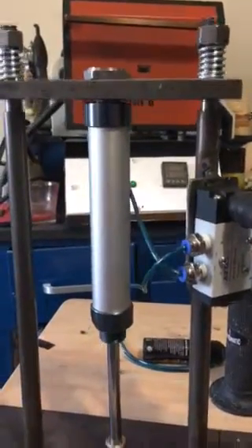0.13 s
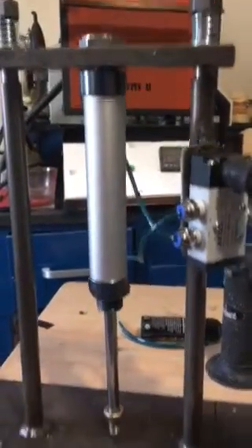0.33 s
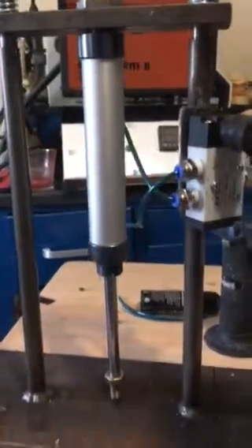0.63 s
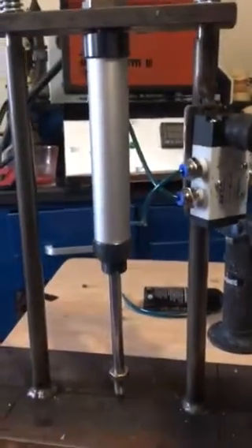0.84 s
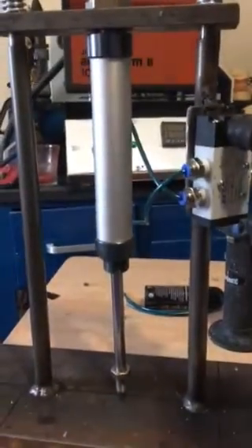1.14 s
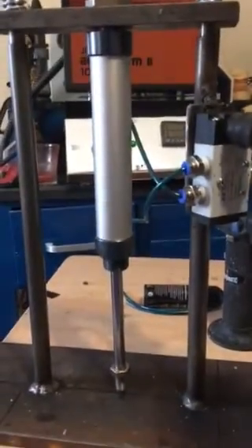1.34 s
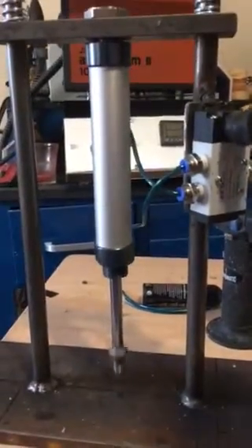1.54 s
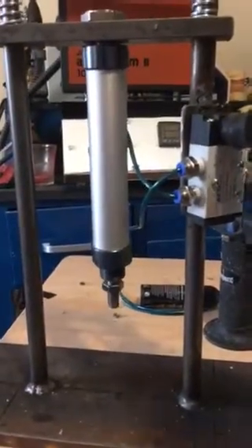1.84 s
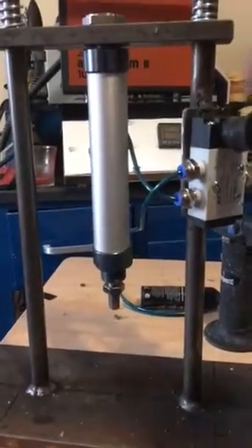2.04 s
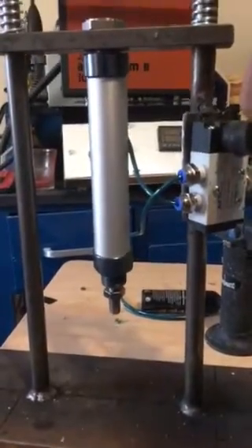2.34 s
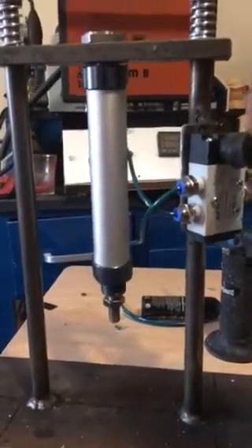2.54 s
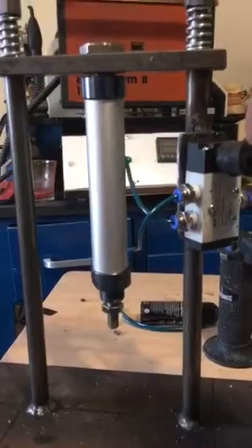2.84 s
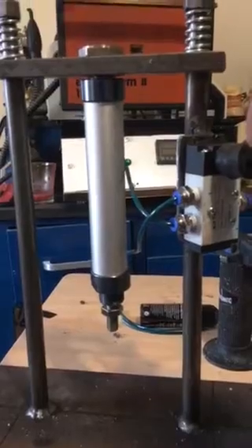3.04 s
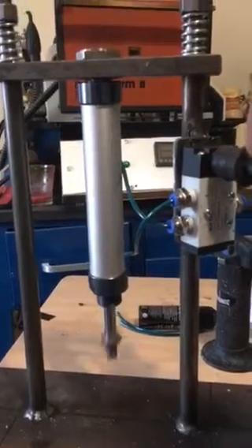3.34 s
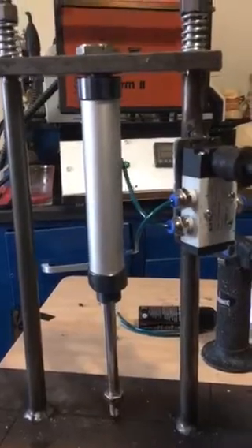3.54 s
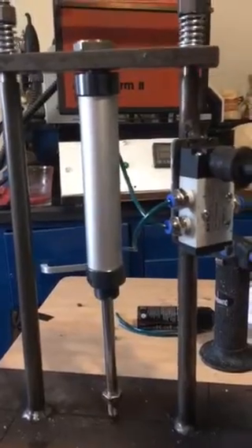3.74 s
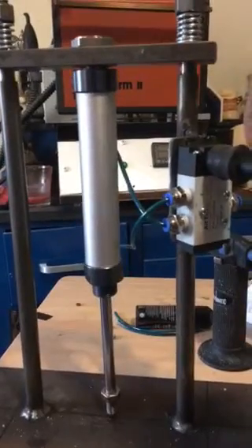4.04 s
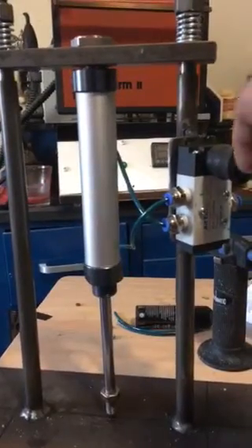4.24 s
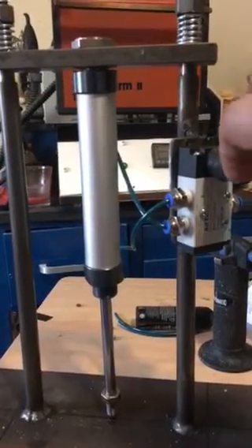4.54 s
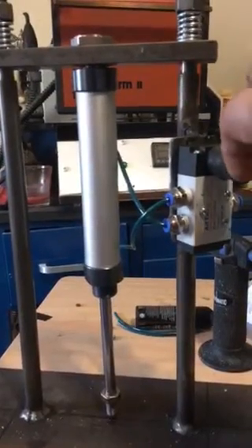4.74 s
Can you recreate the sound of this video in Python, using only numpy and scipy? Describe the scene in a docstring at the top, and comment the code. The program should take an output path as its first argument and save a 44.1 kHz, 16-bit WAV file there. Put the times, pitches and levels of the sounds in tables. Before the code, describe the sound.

A homemade air-cylinder press clicks and blasts compressed air, knocks home leaving a faint whistling ring, then blasts again and clanks hard.

```python
"""A homemade pneumatic press blasts exhaust air through its two ports, heard in mono from close by.
Each blast is turbulent noise shaped by port resonances and driven by the blow-down of a chamber.
A hand valve clicks over and one port blasts until the piston bumps home; the steel frame rings on.
Then the other port blasts, and the rod shoots out and clanks against its end stop.
Knocks are noise bursts and damped modes; a small workshop adds its decay, rumble, hiss and rustles."""
import sys
import numpy as np
from scipy import signal
from scipy.fft import rfft, irfft, next_fast_len
from scipy.io import wavfile
from scipy.ndimage import uniform_filter1d, map_coordinates

SR = 44100
rng = np.random.default_rng(int(sys.argv[2]) if len(sys.argv) > 2 else 0)


def file_out(sig):
    """Save sig as 16-bit WAV at sys.argv[1]."""
    # one column per channel
    cols = np.atleast_2d(sig).T
    # limit, then scale
    lim = np.clip(cols, -1, 1)
    pcm = np.round(lim * 32767).astype(np.int16)
    wavfile.write(sys.argv[1], SR, pcm)


N = 215539

# The piston meets an end stop:
# (time [s], rear cap level [dB], front cap level [dB], rod level [dB], frame level [dB])
STOP_HITS = [(1.793, -22.5, -71, -49.5, -68), (1.7949, -17.5, -69, -38.5, -41.5),
             (3.5489, -45, -27, -6.5, -69.5), (3.5535, -63.5, -20, -13, -79)]
# Modes of the piston rod: (frequency [Hz], relative level [dB], t60 [s])
ROD_MODES = [(4149, 2.5, 0.057), (4170, -6, 0.13), (4110, -18, 0.24), (4140, -23, 0.47), (4290, -26.5, 0.3),
             (6120, -4.5, .06), (6200, -14.5, .16), (6050, -27, 0.29), (3130, -29, 0.29), (3370, -20, .13),
             (4678, -13.5, 0.074)]
# Long modes of the sprung steel frame; the close pair starts in opposite sense,
# so the tone swells in as the shorter mode dies: (frequency [Hz], relative level [dB], t60 [s])
FRAME_MODES = [(748.7, 0.5, 3.66), (749.2, 1.3, 0.84), (1434, -11.5, .8), (2420, -9, .4)]
# The up stroke and the down stroke: (port opens [s], piston stops [s], opening time [s],
# steady level [dB], surplus of the full chamber [dB], blow-down time [s], first spit peak [dB],
# spit delay [s], fade after the stop [dB per s])
PISTON_STROKES = [(1.4742, 1.791, 0.024, -17, 6.5, .088, -12, .0045, 747),
                  (3.2955, 3.55, 0.011, -22.5, 4.5, 0.1, -10.5, 0.0059, 421)]


def amp(db):
    """Amplitude ratio of a level in decibels."""
    return 10 ** (np.asarray(db) / 20)


def unit(x):
    """Signal normalised to an rms of 1."""
    return x / np.sqrt(np.mean(x ** 2) + 1e-20)


def along(points, hz):
    """Linear interpolation of (frequency [Hz], value) points on a logarithmic frequency axis."""
    f, v = np.transpose(points)
    return np.interp(np.log(hz + 1), np.log(f + 1), v)


def since(s):
    """Seconds since a moment, zero before it."""
    return np.maximum(np.arange(N) / SR - s, 0)


def wobble(rate):
    """Smooth random modulation: a spline through normal random knots, rate knots a second."""
    knots = rng.standard_normal(int(N * rate / SR) + 4)
    return map_coordinates(knots, [np.arange(N) * rate / SR])


def filtered(x, response):
    """Linear filtering: the spectrum times a response of frequency, padded against wrap-around."""
    m = next_fast_len(N + SR // 2)
    return irfft(rfft(x, m) * response(np.fft.rfftfreq(m, 1 / SR)), m)[:N]


def noise(spectrum, bells=()):
    """Spectral shaping: noise of rms 1 with a broad colour and narrow resonances or notches."""
    def colour(hz):
        level_db = along(spectrum, hz)
        for centre, width, db in bells:
            level_db = level_db + db / (1 + (2 * (hz - centre) / width) ** 2)
        return amp(level_db)
    return unit(filtered(rng.standard_normal(N), colour))


def decay(t, t60):
    """Exponential decay by 60 dB in t60 seconds."""
    return np.exp(-np.log(1000) * t / t60)


def ring(modes, s, waver_hz=0):
    """Modal superposition: damped sines struck at one moment; a loose fit makes their pitch waver."""
    t = since(s)
    out = np.zeros(N)
    for k, (hz, db, t60) in enumerate(modes):
        drift = waver_hz * np.cumsum((t > 0) * wobble(250)) / SR if waver_hz else 0
        sense = (-1) ** k  # neighbouring modes start in opposite sense
        out += sense * amp(db) * decay(t, t60) * np.sin(2 * np.pi * (hz * t + drift))
    return out


def crack(s, t60, colour):
    """Impact noise: a contact starts a coloured burst that decays exponentially."""
    t = since(s)
    return (t > 0) * decay(t, t60) * noise(colour)


def thuds(rows):
    """Low-frequency transients: pushes that swell, sag in pitch and die within a few cycles."""
    out = np.zeros(N)
    for s, db, start_hz, end_hz, swell in rows:
        u = since(s) / swell
        cycles = swell * (end_hz * u + (start_hz - end_hz) * (1 - np.exp(-u)))
        out += amp(db) * u * np.exp(1 - u) * np.sin(2 * np.pi * cycles)
    return out


def swells(rows):
    """Power summation: a gain curve of separate swells that each rise to a peak and die away."""
    t = np.arange(N) / SR
    power = np.zeros(N)
    for s, db, rise, fall in rows:
        times_away = np.maximum((s - t) / rise, (t - s) / fall)
        power += amp(db) ** 2 * np.exp(-2 * times_away)
    return np.sqrt(power)


def background():
    """Stationary and modulated noise: rumble, a drifting hiss that dips once, rustles and bumps."""
    # Room rumble: (frequency [Hz], relative level [dB per Hz])
    rumble_colour = [(20, -25.5), (32, -15), (45, 0.5), (70, 0.5), (150, -6), (240, -5.5), (340, -12),
                     (520, -19.5), (900, -22.5), (1500, -22), (2200, -25), (4000, -35), (12000, -52.5)]
    # Faint hiss: (frequency [Hz], relative level [dB per Hz])
    hiss_colour = [(400, -19), (1000, -6), (2000, -3.5), (4500, -2), (6500, -2.5), (9300, -6),
                   (10300, -8.5), (11500, -8.5), (16000, -13)]
    # Slow drift of the hiss: (time [s], level before the dip [dB])
    hiss_drift = [(0, -71), (1.0, -81.5), (1.4, -73.5), (2.15, -66.5), (2.45, -73), (2.8, -70.5),
                  (3.9, -67.5), (4.88, -70)]
    # The hiss dips briefly: (from [s], to [s], level change [dB])
    hiss_dip = (2.225, 2.37, -14)
    # Soft rustles of handling: (peak time [s], level [dB], rise [s], fall [s])
    rustle_swells = [(.01, -63.5, 0.041, 0.036), (.225, -66, 0.052, .07), (.635, -71.5, .008, 0.046),
                     (.86, -63.5, 0.082, 0.065), (1.095, -66.5, 0.019, 0.28), (1.4, -68, 0.13, 0.13),
                     (2.83, -70.5, .03, 0.062), (3.285, -60.5, 0.023, .03), (3.95, -67, 0.061, .03),
                     (4.6, -69, 0.021, 0.055)]
    # Colour of the rustles: (frequency [Hz], relative level [dB per Hz])
    rustle_colour = [(300, -8.5), (1000, -2), (2300, 0), (4500, -2.5), (6500, -6.5), (10000, -14),
                     (16000, -21.5)]
    # Soft bumps of handling:
    # (time [s], peak level [dB], starting frequency [Hz], final frequency [Hz], swell time [s])
    handling_bumps = [(2.915, -55, 110.5, 59.5, 0.0084), (4.025, -51.5, 171, 154, .012),
                      (4.58, -50, 69.7, 51.7, 0.012)]

    t = np.arange(N) / SR
    dip_from, dip_to, dip_db = hiss_dip
    # the moving average, in samples, softens the edges of the dip
    dip = uniform_filter1d(1.0 * ((t > dip_from) & (t < dip_to)), size=400)
    hiss_db = np.interp(t, *np.transpose(hiss_drift)) + dip_db * dip
    rumble = amp(-62.5) * noise(rumble_colour)
    hiss = amp(hiss_db) * noise(hiss_colour)
    rustles = swells(rustle_swells) * noise(rustle_colour)
    return rumble + hiss + rustles + thuds(handling_bumps)


def workshop(x, delay_s=0.004):
    """Reverberation: convolution with a noise tail, each frequency dying at its own rate."""
    # Decay of the room: (frequency [Hz], t60 [s])
    room_decay = [(100, 0.19), (250, 0.36), (1000, 0.31), (3000, 0.35), (6000, 0.35), (9000, 0.18),
                  (11000, 0.15), (16000, 0.23)]
    hz, t, cells = signal.stft(rng.standard_normal(SR // 2), SR, nperseg=256)
    decaying = cells * decay(t, along(room_decay, hz)[:, None])
    tail = signal.istft(decaying, SR, nperseg=256)[1]
    delayed = np.pad(x, (int(delay_s * SR), 0))
    return signal.fftconvolve(delayed, tail / np.linalg.norm(tail))[:N]


def earlier_stroke():
    """Free decay: rod and frame still ring faintly from the stroke before."""
    rod_remnant = amp(-7) * ring(ROD_MODES, -0.26, waver_hz=130)
    frame_remnant = amp(-66.5) * ring(FRAME_MODES, -0.25)
    return rod_remnant + frame_remnant


def base():
    """Forced response: the heavy base answers each end stop with a short, late rumble."""
    # The steel base takes up each blow: (peak time [s], level [dB], rise [s], fall [s])
    base_swells = [(1.82, -46.5, .012, .035), (3.574, -38, .014, .028)]
    # Colour of its rumble: (frequency [Hz], relative level [dB per Hz])
    base_colour = [(90, -20.5), (160, -15.5), (200, 3.5), (245, 1.5), (300, -9.5), (350, -3.5),
                   (460, -14.5), (650, -13), (900, -25), (2000, -41.5)]
    return swells(base_swells) * noise(base_colour)


def frame():
    """Lightly damped modes: the sprung frame sings on like a faint whistle."""
    return sum(amp(frame_db) * ring(FRAME_MODES, s) for s, _, _, _, frame_db in STOP_HITS)


def rod():
    """Modulated modes: the rod rings roughly in its loose bearing after each stop."""
    return sum(amp(rod_db) * ring(ROD_MODES, s, waver_hz=45) for s, _, _, rod_db, _ in STOP_HITS)


def cap_knocks():
    """Impact excitation: the piston knocks on the end caps, and the cylinder tube clunks."""
    # Knock of each end cap: (frequency [Hz], relative level [dB per Hz])
    rear_colour = [(60, -27.5), (220, -2), (310, -13.5), (500, -6.5), (900, 2), (1500, 0), (2100, 2.5),
                   (4000, 1.5), (5500, -7.5), (9000, -21.5), (15000, -29)]
    front_colour = [(90, -25), (230, -13), (350, -11.5), (460, -22), (630, -18.5), (780, 3), (1000, -13),
                    (1450, -2.5), (2000, -10), (3800, -6), (6500, -10), (10000, -31.5)]
    # Hollow clunk of the cylinder tube: (frequency [Hz], relative level [dB], t60 [s])
    tube_modes = [(212, -12.5, 0.15), (334, -13.5, 0.088), (772, 1, .13), (830, -3, 0.045),
                  (1290, -5, 0.07), (1590, -9, 0.11)]
    out = np.zeros(N)
    for s, rear_db, front_db, _, _ in STOP_HITS:
        out += amp(rear_db) * crack(s, t60=0.025, colour=rear_colour)
        out += amp(front_db) * crack(s, t60=0.089, colour=front_colour)
        tube_gain = amp(rear_db - 16) + amp(front_db - 5.5)
        out += tube_gain * ring(tube_modes, s, waver_hz=18.1)
    return out


def clicks():
    """Impact of light parts: each contact gives a short metal ring and a dull snap."""
    # The valve spool clicks over, the frame ticks as it settles:
    # (time [s], metal ring level [dB], dull snap level [dB])
    contacts = [(0.625, -74, -64), (1.075, -64, -66), (1.456, -45, -45), (1.466, -18.5, -34),
                (1.4785, -20.5, -11), (1.501, -45, -46), (2.276, -73, -51.5), (2.351, -84, -59),
                (3.279, -55, -68)]
    # Modes of the valve body: (frequency [Hz], relative level [dB], t60 [s])
    valve_modes = [(3600, -2, 0.027), (4000, -5.5, 0.022), (6500, -11, 0.014), (8115, -12, 0.0078)]
    # Colour of the dull snap: (frequency [Hz], relative level [dB per Hz])
    snap_colour = [(100, -23.5), (400, -2), (1400, -0.5), (2200, -6.5), (5000, -18.5), (12000, -34.5)]
    out = np.zeros(N)
    for s, ring_db, snap_db in contacts:
        out += amp(ring_db) * ring(valve_modes, s, waver_hz=120.7)
        out += amp(snap_db) * crack(s, t60=0.016, colour=snap_colour)
    return out


def seal():
    """Frictional chirp: the piston seal gives one short rising squeak as it starts to slide."""
    # The seal breaks free: (peak level [dB], frequency at the peak [Hz], glide [Hz per s],
    # half-length [s], whose sign has no effect)
    squeak = (-21.5, 3320, 22000, -0.0038)
    db, hz, glide, half = squeak
    t = np.arange(N) / SR - 1.536  # seconds from the peak
    envelope = amp(db) * np.exp(-(t / half) ** 2 / 2)
    return envelope * np.sin(2 * np.pi * (hz * t + glide * t ** 2 / 2))


def draught(lumpy_db=3, calm_db_per_s=300):
    """Convected flow: exhaust reaches the microphone as puffs, then eddies that calm after the stop."""
    # Pressure wave as a port opens:
    # (time [s], peak level [dB], starting frequency [Hz], final frequency [Hz], swell time [s])
    puffs = [(1.464, -32, 138, 65.5, 0.01), (1.4802, -5.5, 316, 75.8, 0.0015),
             (3.293, -38.5, 282, 209.6, 0.0049), (3.3025, -29.5, 90, 71.8, 0.0049)]
    # Eddies of stray air: (peak time [s], level [dB], rise [s], fall [s])
    eddy_swells = [(1.48, -39.5, 0.0074, .11), (1.632, -27, 0.012, .045), (1.69, -31.5, 0.025, 0.045)]
    # Colour of their flutter: (frequency [Hz], relative level [dB per Hz])
    flutter_colour = [(25, -24), (60, -13.5), (180, -1), (350, -6.5), (600, -5), (900, -15), (1400, -9),
                      (3000, -33), (8000, -60.5)]
    home = PISTON_STROKES[0][1]
    strength = swells(eddy_swells) * amp(-calm_db_per_s * since(home))
    flutter = unit(amp(lumpy_db * wobble(90)) * noise(flutter_colour))
    return thuds(puffs) + strength * flutter


def exhaust_flow(stroke):
    """Blow-down: a port spits and opens; pressure falls to the steady flow the piston drives to its stop."""
    (start, stop, opening, steady_db, surplus_db, blowdown,
     spit_db, spit_delay, fade_db_per_s) = stroke
    t = since(start)
    opened = np.sin(np.pi / 2 * np.minimum(t / opening, 1)) ** 2
    # an exponent above 1 makes the chamber hold its pressure a while before it falls
    pressure = np.exp(-(t / blowdown) ** 2.1)
    stream = opened * amp(steady_db + surplus_db * pressure - fade_db_per_s * since(stop))
    u = t / spit_delay
    # the exponent sets how briefly the air trapped in the valve escapes
    spit = amp(spit_db) * (u * np.exp(1 - u)) ** 5.5
    return np.hypot(stream, spit)


def jet(stroke, hiss, port, unsteady_db, settle_s, raw_share=0.77):
    """Jet turbulence leaves a resonant port: (sound straight ahead, sound spread round the room)."""
    # Sound spread sideways, as the treble beams ahead: (frequency [Hz], relative level [dB per Hz])
    spill_colour = [(100, -24), (220, -17), (500, -19), (1500, -8), (2500, -4), (4000, -1), (5500, 1.5),
                    (7000, -1), (8900, 0.5), (9600, -11), (11000, -13), (14200, -5.5), (15800, -12)]
    strength = exhaust_flow(stroke) * amp(unsteady_db * wobble(120))
    plain = noise(hiss)
    coloured = noise(hiss, port)
    # the first rush is broad and raw; the port's resonances take over as the flow settles
    raw = raw_share * np.exp(-since(stroke[0]) / settle_s)
    ahead = np.sqrt(raw) * plain + np.sqrt(1 - raw) * coloured
    return strength * ahead, strength * noise(spill_colour)


def scene():
    """Superposition of both strokes, their knocks and ringing, and the workshop round them, in mono."""
    # Hiss of each jet: (frequency [Hz], relative level [dB per Hz])
    up_hiss = [(60, -23), (250, -15.5), (600, -21.5), (1200, -13), (2600, -14.5), (4000, -10.5), (6000, 1),
               (8600, -3.5), (10200, -15.5), (13000, -9.5), (15600, -5.5)]
    down_hiss = [(60, -37.5), (250, -33.5), (600, -37), (1200, -19.5), (2600, -12.5), (4000, -12.5),
                 (6000, 2), (8000, -4), (10200, -13.5), (13000, -18), (15600, -18.5)]
    # Resonances and notches of each port with its hose: (frequency [Hz], width [Hz], gain [dB])
    up_port = [(4100, 250, 10.5), (4543, 270, 16), (5300, 85, 9), (5598, 500, 7), (7300, 440, 6),
               (7750, 90, -9.5), (8407, 160, -9.5), (8920, 260, 9), (9530, 390, 5), (11400, 481, 2.5),
               (14000, 380, 14), (14450, 140, -6), (14800, 250, 7), (15350, 360, 3.5)]
    down_port = [(2450, 130, 7), (3651, 780, 15.5), (4260, 66, 4), (4830, 200, 11.5), (5100, 250, -7.5),
                 (8000, 100, -11.5), (8290, 180, 8.5), (9850, 120, 8.5), (11280, 219, 11), (11900, 520, 16),
                 (12679, 224, 2.5), (13165, 200, 7), (13200, 260, 11.5), (14350, 770, 17), (15110, 400, 14),
                 (15680, 160, 13)]
    up_stroke, down_stroke = PISTON_STROKES
    up, up_spread = jet(up_stroke, up_hiss, up_port, unsteady_db=0.42, settle_s=0.011)
    down, down_spread = jet(down_stroke, down_hiss, down_port, unsteady_db=0.4, settle_s=0.026)
    knocks = clicks() + cap_knocks() + seal()
    clank = rod()
    to_room = amp(-12.0) * up_spread + amp(-11.0) * down_spread
    to_room += amp(-10.5) * knocks + amp(-16.0) * clank
    machine = up + down + knocks + clank + base() + frame()
    mono = machine + workshop(to_room) + draught() + earlier_stroke() + background()
    return np.array([mono, mono])


def record(dry):
    """Band-limiting and saturation: a small microphone loses deep bass and rounds off peaks."""
    highpass = signal.butter(3, 33, "highpass", fs=SR, output="sos")  # corner in Hz
    thin = signal.sosfilt(highpass, dry)
    rounded = thin / (1 + np.abs(thin / 0.76) ** 8) ** (1 / 8)  # peaks stay below 0.76

    def band(hz):
        return 1 / np.sqrt(1 + (hz / 15800) ** 240)  # steep upper limit in Hz
    return np.array([filtered(channel, band) for channel in rounded])


dry = scene()
out = record(dry)
file_out(out)
```